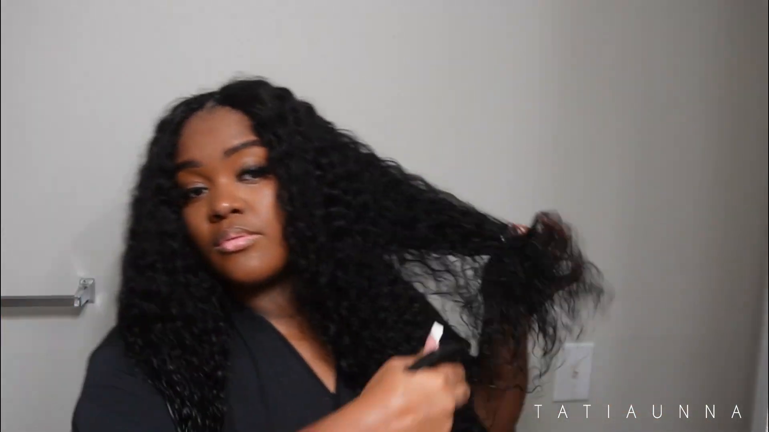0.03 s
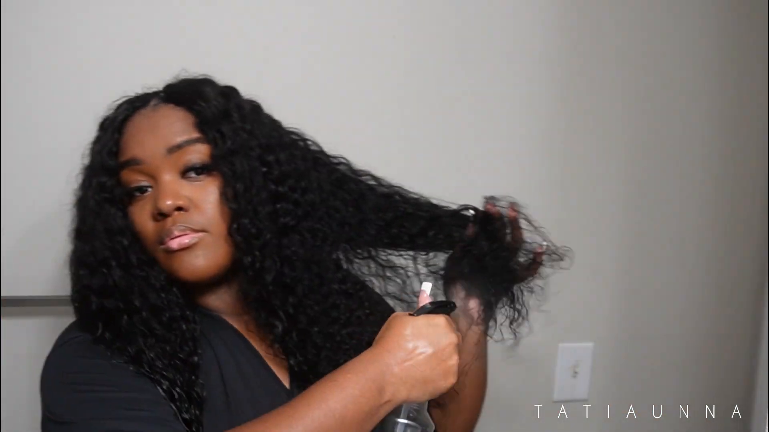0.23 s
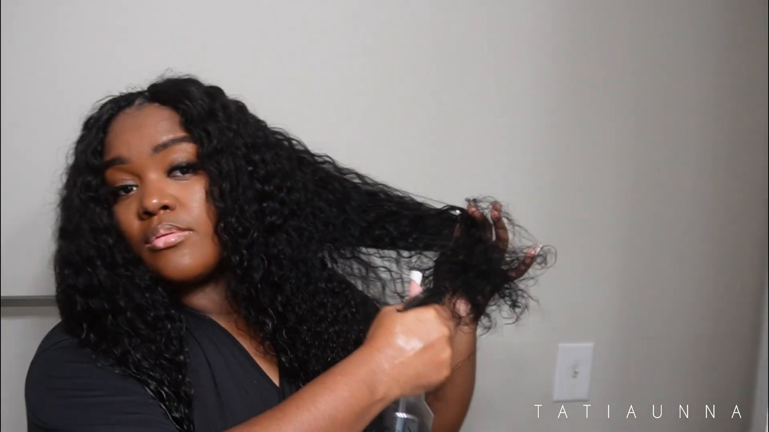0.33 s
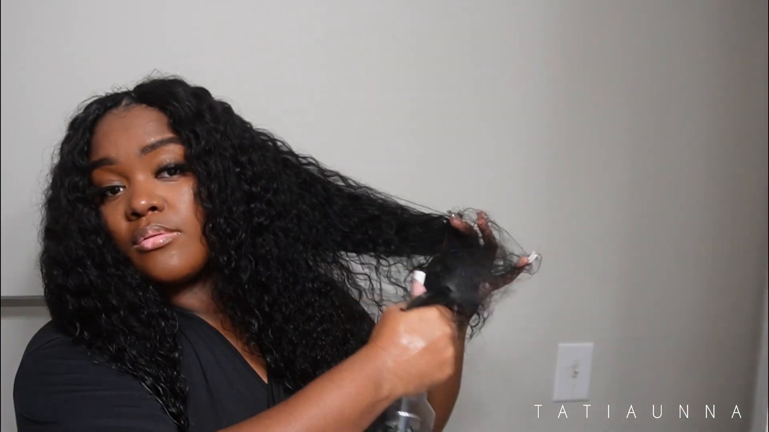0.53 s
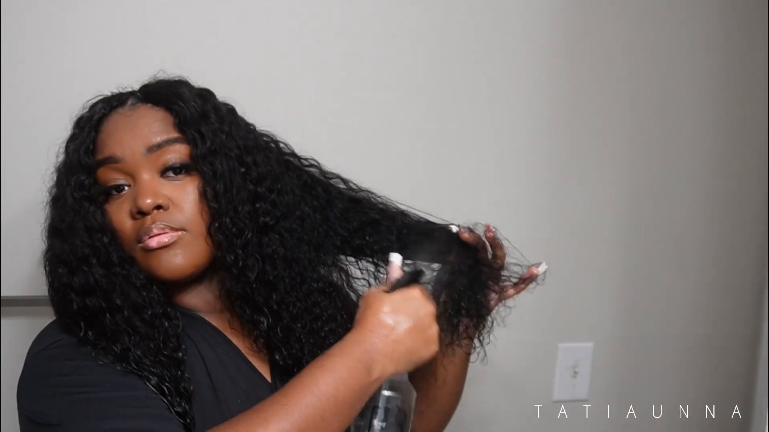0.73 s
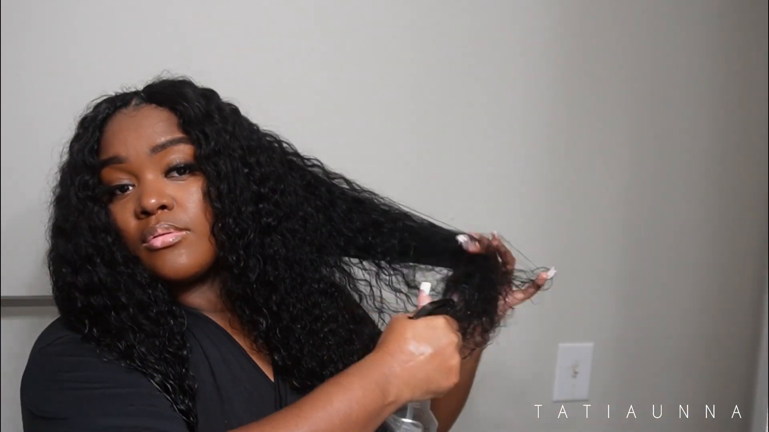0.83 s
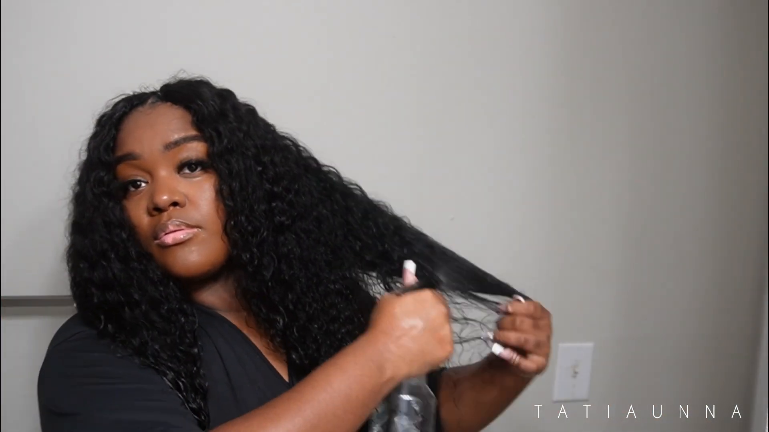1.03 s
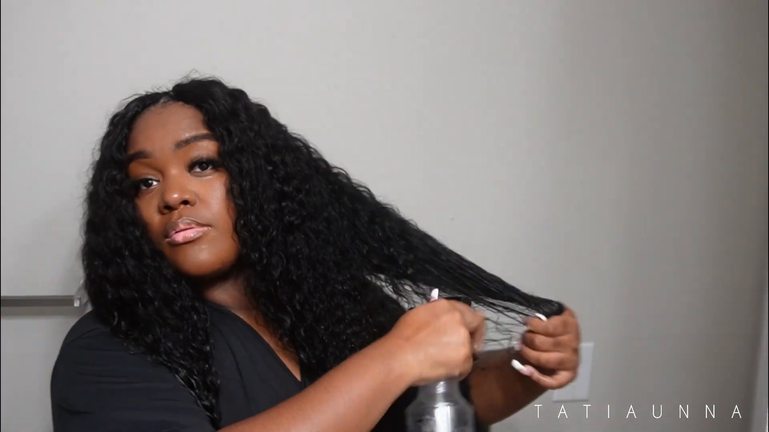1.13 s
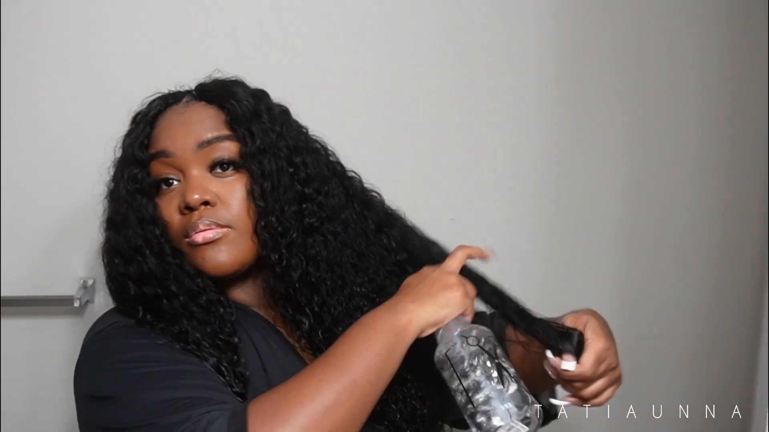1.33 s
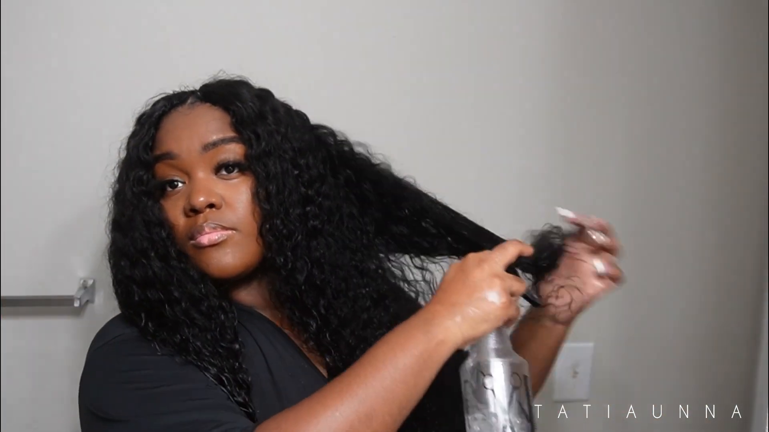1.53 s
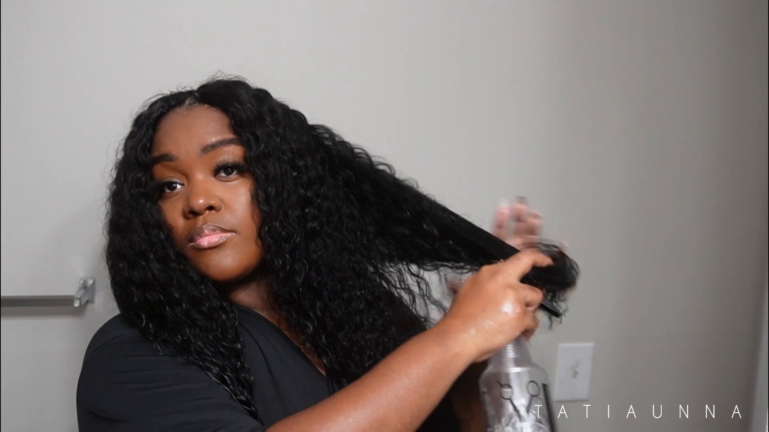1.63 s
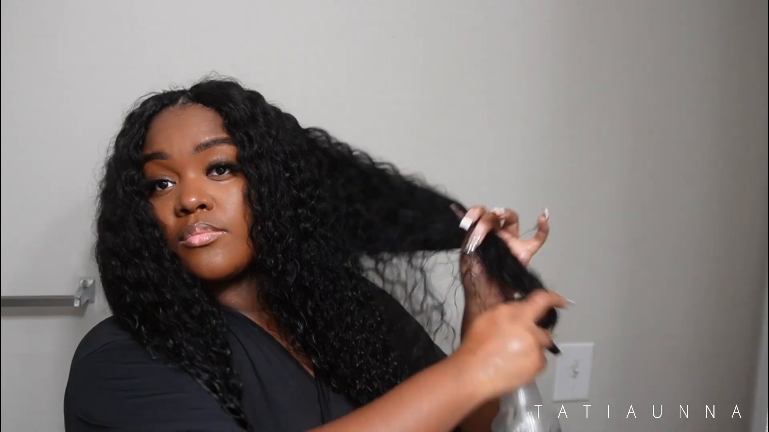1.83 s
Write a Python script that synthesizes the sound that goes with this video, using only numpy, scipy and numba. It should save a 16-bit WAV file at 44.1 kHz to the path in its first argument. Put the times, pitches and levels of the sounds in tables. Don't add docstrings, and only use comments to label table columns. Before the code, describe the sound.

A trigger spray bottle gives four quick hissing squirts, each with a click and springy return, then nails tick on plastic and fingers rustle wet hair; small hard room, low fan hum, camera a metre or two away.

```python
import sys
import numpy as np
from scipy import signal
from scipy.fft import rfft, irfft, next_fast_len
from scipy.io import wavfile
from scipy.ndimage import uniform_filter1d
from numba import njit

SR = 44100
rng = np.random.default_rng(int(sys.argv[2]) if len(sys.argv) > 2 else 0)


def undo_db(level):
    steps = np.asarray(level, float) / 20
    return 10 ** steps


def bounce(signal):
    frames = np.transpose(np.atleast_2d(signal))
    limited = np.clip(frames, -1, 1)
    pcm = np.round(limited * 32767).astype(np.int16)
    wavfile.write(sys.argv[1], SR, pcm)


N = 83790
T = np.arange(N) / SR


def curve(table, hz):
    table = np.array(table, float)
    return np.interp(np.log(hz + 1), np.log(table[:, 0] + 1), table[:, 1])


def colour(x, gain_db):
    size = next_fast_len(len(x) + 2048)
    hz = np.arange(size // 2 + 1) * SR / size
    return irfft(rfft(x, size) * undo_db(gain_db(hz)), size)[:len(x)]


def unit(x):
    return x / np.sqrt(np.mean(x ** 2))


def bell(hz, width):
    return lambda f: -10 * np.log10(1 + ((f - hz) / (width / 2)) ** 2)


def walk(rate_hz):
    k = int(SR / rate_hz)
    return unit(uniform_filter1d(uniform_filter1d(rng.standard_normal(N), k), k))


def grains(per_s, spread_db):
    hit = rng.random(N) < per_s / SR
    size = rng.exponential(size=N)
    sign = rng.standard_normal(N)
    return unit(hit * np.tanh(sign) * undo_db(spread_db * np.minimum(size, 3)))


@njit
def sweep(x, hz, width):
    y, band, low = np.empty(len(x)), 0., 0.
    for i in range(len(x)):
        g, k = np.tan(np.pi * hz[i] / SR), width / hz[i]
        v = (band + g * (x[i] - low)) / (1 + g * (g + k))
        band, low, y[i] = 2 * v - band, low + 2 * g * v, k * v
    return y


# start in seconds, rise in seconds, hold in seconds, peak in dB, pump level in dB.
SQUEEZES = [
    (.201, 0.081, 0.036, -26, -35),
    (0.478, 0.059, 0.039, -21.5, -38.5),
    (0.742, 0.056, 0.037, -22.5, -37),
    (0.988, 0.062, 0.023, -22, -32.5),
]
PUFF_DB = [-54, -32.5, -40, -39]
# frequency in Hz, density in dB per Hz.
JET = [(300, -25.5), (600, -21.5), (1100, -14), (1700, -4), (2500, -4.5), (3900, -3.5), (6500, -6),
       (15500, -17)]
# frequency in Hz, density in dB per Hz.
PUMP = [(250, -9), (700, -2.5), (1200, 1.5), (2500, -0.5), (6000, -19), (15000, -31)]


def nozzle_whistle(loss_db):
    centre_hz, width_hz, sag_per_db = 3710, 1080., 0.016
    hz = centre_hz * np.clip(1 + sag_per_db * loss_db + 0.085 * walk(43), .4, 1.5)
    whistle = rng.standard_normal(N)
    for _ in range(2):
        whistle = sweep(whistle, hz, width_hz)
    return unit(whistle)


def air_puffs():
    decay_s = .018
    level = np.zeros(N)
    for (start, *_), db in zip(SQUEEZES, PUFF_DB):
        level += undo_db(db) * (T > start) * np.exp(-np.clip(T - start, 0, 1) / decay_s)
    bright = [(1000, -33), (3500, 0), (9000, 2), (15500, -4)]  # (Hz, dB per Hz)
    return level * unit(colour(rng.standard_normal(N), lambda f: curve(bright, f)))


def spray():
    open_db, rise_bend, fall_db_s = -16, 0.91, 286
    jet_gain, pump_gain, loss_db = np.zeros(N), np.zeros(N), np.zeros(N)
    for start, rise, hold, db, pump_db in SQUEEZES:
        t = T - start
        climb = open_db * (1 - np.clip(t / rise, 0, 1) ** rise_bend)
        fall = -fall_db_s * np.clip(t - rise - hold, 0, 1)
        jet_gain += (t > 0) * undo_db(db + climb + fall)
        pump_gain += (t > 0) * undo_db(pump_db + 0.087 * climb + 0.41 * fall)
        loss_db = np.where(t > 0, climb + .3 * fall, loss_db)
    droplets = undo_db(-7) * grains(9000, 2)
    hiss = unit(colour(rng.standard_normal(N) + droplets, lambda f: curve(JET, f)))
    flutter = undo_db(0.14 * walk(60))
    jet = hiss * flutter + nozzle_whistle(loss_db) * undo_db(-5.5 + 1.9 * walk(96))
    pump = unit(colour(grains(6000, 1.3), lambda f: curve([(60, -58), *PUMP], f)))
    return air_puffs() + jet * jet_gain + pump * pump_gain * undo_db(2.3 * walk(50))


# start in seconds, peak in dB, pitch in Hz, T60 in seconds.
KNOCKS = [(0.2014, -22, 1230, .03), (.208, -31, 1090, 0.088), (0.227, -26, 1050, .04),
          (0.475, -28, 3100, 0.022), (0.48, -38.5, 302, 0.092), (0.74, -38, 231, 0.16),
          (.739, -43, 3000, 0.013), (.905, -23, 3410, 0.041), (.91, -21, 1172, 0.035),
          (0.955, -37, 2960, 0.026), (.995, -38, 266, 0.29), (0.997, -35, 3080, .015),
          (1.178, -31, 723, 0.089), (1.188, -38, 680, 0.1), (1.2, -37.5, 313, 0.059),
          (1.222, -36.5, 744, .08), (1.233, -39, 703, 0.074), (1.425, -39, 8100, 0.018),
          (1.471, -29, 4000, 0.014), (1.485, -35.5, 344, 0.069), (1.487, -36, 630, 0.055),
          (1.512, -33.5, 1495, 0.058), (1.6025, -24.5, 3730, 0.058), (1.607, -28.5, 3700, .05),
          (1.611, -30.5, 3780, 0.057), (1.632, -32.5, 1710, .04), (1.661, -54, 1260, 0.066),
          (1.83, -44, 3480, 0.033)]


def knocks():
    spread, contact_cycles, crack_s = .12, 0.82, 0.0034
    out, cracks, t = np.zeros(N + SR), np.zeros(N + SR), T[:SR // 4]
    chance = rng.standard_normal((len(KNOCKS), 12))
    for (start, db, hz, t60), c in zip(KNOCKS, chance):
        detunes = spread * (np.linspace(-1, 1, num=6) + c[:6] / 6)
        ring = np.zeros(len(t))
        for detune, phase in zip(detunes, c[6:]):
            weight = np.exp(-(detune / spread) ** 2)
            ring += weight * np.sin(2 * np.pi * hz * (1 + detune) * t + phase / 2)
        contact = np.sin(np.pi / 2 * np.minimum(t * hz / contact_cycles, 1)) ** 2
        at = slice(int(start * SR), int(start * SR) + len(t))
        out[at] += undo_db(db - 7.5 - 60 * t / t60) * ring * contact
        cracks[at] += undo_db(db) * np.exp(-t / crack_s) * min(hz / 3000, 1)
    crack = colour(cracks[:N] * rng.standard_normal(N), lambda f: 2 * bell(3000, 6000)(f))
    return out[:N] + 0.21 * crack


# start in seconds, length in seconds, level in dB, centre in Hz, width in octaves.
RUBS = [(.48, 0.056, -48, 394, 0.66), (.203, 0.046, -43, 1120, 0.5), (0.389, 0.05, -38, 3040, 1.96),
        (0.405, 0.06, -43.5, 700, 1), (0.646, 0.06, -38.5, 2500, 2.1), (.66, 0.092, -43.5, 645, 2.2),
        (.87, .09, -29.5, 3050, 1.35), (0.9, 0.076, -35.5, 750, 1.73), (1.154, 0.045, -45, 710, 0.97),
        (1.17, 0.095, -48, 5400, 1.2), (1.378, 0.017, -54.5, 8850, 1.7), (1.404, 0.067, -54, 6960, 0.42),
        (1.42, 0.022, -55, 3970, 0.37), (1.47, 0.05, -42.5, 4100, 0.7), (1.47, 0.035, -50, 8350, 0.58),
        (1.505, 0.099, -40.5, 1460, 1.98), (1.478, 0.076, -44, 880, 1.8), (1.51, 0.059, -47.5, 6500, 0.49),
        (1.604, 0.071, -39.5, 4040, 0.97), (1.613, 0.067, -40.5, 1770, 1), (1.618, .05, -53, 11900, 2.7),
        (1.695, 0.059, -50, 2510, 2.1), (1.804, 0.04, -55, 3870, 1.1), (1.825, 0.037, -51, 4500, 1.13)]


def rubs():
    attack_s, release_s = .003, 0.017
    out, slips, t = np.zeros(N + SR), grains(5000, 2.0), T[:SR // 4]
    uneven = undo_db(2.1 * walk(45))
    for k, (start, length, db, hz, octaves) in enumerate(RUBS):
        fade = undo_db(-5 * t / length) * np.exp(-np.clip(t - length, 0, 1) / release_s)
        shape = np.clip(t / attack_s, 0, 1) * fade
        piece = slice(k * 3000, k * 3000 + len(t))
        band = colour(slips[piece], lambda f: np.maximum(-12 * (np.log2((f + 1) / hz) / octaves) ** 2, -45))
        at = int(start * SR)
        out[at:at + len(t)] += undo_db(db) * uneven[piece] * shape * unit(band)
    return out[:N]


# frequency in Hz, T60 in seconds.
ROOM_T60 = [(200, 1), (1500, 0.33), (5000, 0.43), (14000, 0.32)]


def tail():
    first_echo_s = 0.0045
    t, out = T[:SR], np.zeros(SR)
    for hz in 125 * 2. ** np.arange(8):
        def octave(f):
            return 10 * np.log10(np.clip(1 - abs(np.log2((f + 1) / hz)), 1e-4, 1))
        t60 = curve(ROOM_T60, hz)
        out += colour(rng.standard_normal(SR), octave) * undo_db(-60 * t / t60) / np.sqrt(t60)
    out = out * (t > first_echo_s)
    return out / np.sqrt(np.sum(out ** 2))


# frequency in Hz, density in dB per Hz.
AIR = [(94, -39), (160, -12), (226, -13), (611, -18), (1170, -17), (2160, -23), (4550, -27), (5310, -30.5),
       (15500, -37.5)]
# frequency in Hz, side minus mid in dB.
AIR_WIDTH = [(60, -26), (110, -30), (200, -11), (380, -6), (700, -8), (1290, -8), (2380, -4.5), (4400, -6),
             (8120, 0), (15000, -6)]
# frequency in Hz, width in Hz, level in dB.
FAN_LINES = [(35, 24, -71.5), (67.4, 4.7, -62.5), (92, 36, -53.5), (143, 35, -61.5), (276.3, 77, -60.5),
             (403.8, 3.2, -65)]


def fan():
    hum_level = np.sqrt(2) * undo_db(-40 + 1.14 * walk(17))
    hum = hum_level * np.sin(2 * np.pi * 120.2 * T + 0.44 * walk(1.7))
    lines = np.zeros(N)
    for hz, width, db in FAN_LINES:
        lines += undo_db(db) * unit(colour(rng.standard_normal(N), lambda f: 2 * bell(hz, width)(f)))
    mid = colour(rng.standard_normal(N), lambda f: curve(AIR, f))
    side = colour(rng.standard_normal(N), lambda f: curve(AIR, f) + curve(AIR_WIDTH, f))
    gain = undo_db(-55 + 0.31 * walk(9)) / np.std(mid)
    return hum + lines + gain * mid, gain * side + undo_db(-30) * np.roll(lines, 9000)


# frequency in Hz, side minus mid in dB.
WIDTH = [(60, -32), (110, -53), (200, -20), (380, -21.5), (700, -21), (1290, -26.5), (2380, -15),
         (4400, -9.5), (8120, -5.5), (15000, -2)]


def scene():
    room_db, knocks_near_db = -3, 1
    hiss, hits = spray() + rubs(), knocks()
    near = hiss + undo_db(knocks_near_db) * hits
    source = hiss + hits
    mid = near + undo_db(room_db) * signal.fftconvolve(source, tail())[:N]
    scatter = rng.standard_normal(2000) * np.exp(-T[:2000] / .007)
    slant = signal.fftconvolve(near, scatter / np.sqrt(np.sum(scatter ** 2)))[:N]
    side = undo_db(0.5) * slant + undo_db(room_db + 3.0) * signal.fftconvolve(source, tail())[:N]
    side = colour(side, lambda f: curve(WIDTH, f))
    fan_mid, fan_side = fan()
    mid, side = mid + fan_mid, side + fan_side
    return np.array([mid + side, mid - side])


def band_limit(x):
    return signal.sosfilt(signal.butter(12, 16550, fs=SR, output="sos"), x)


def record(dry):
    top_hz = 15880
    cut = np.array([colour(channel, lambda f: -90. * (f > top_hz)) for channel in dry])
    return band_limit(cut)


dry = scene()
out = record(dry)
bounce(out)
```